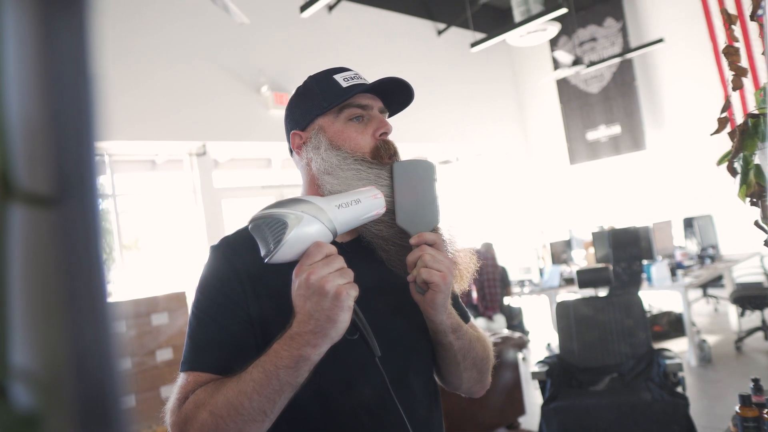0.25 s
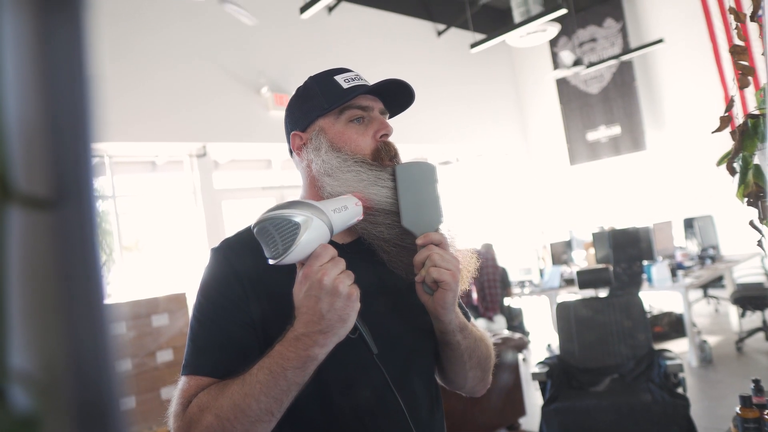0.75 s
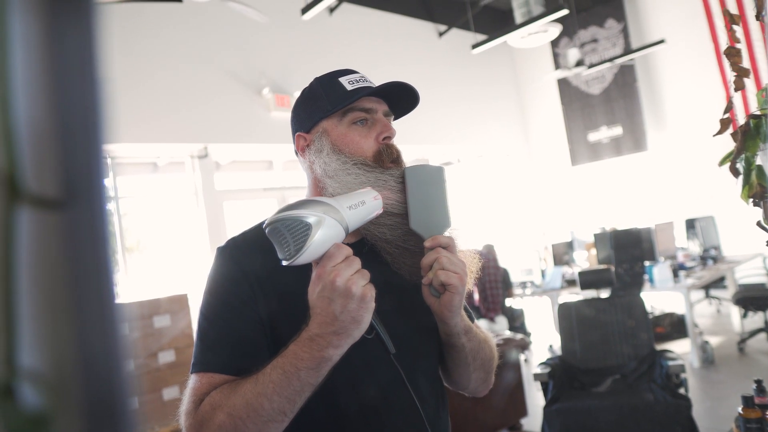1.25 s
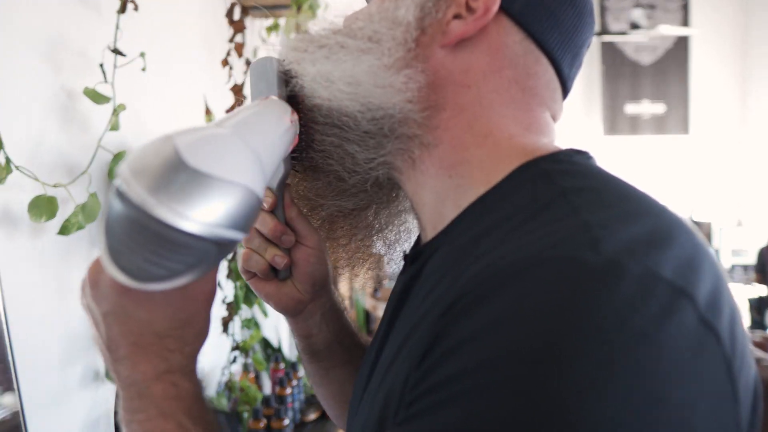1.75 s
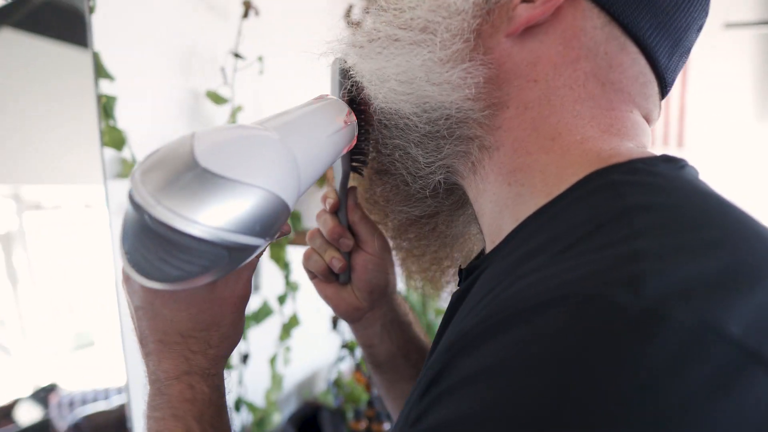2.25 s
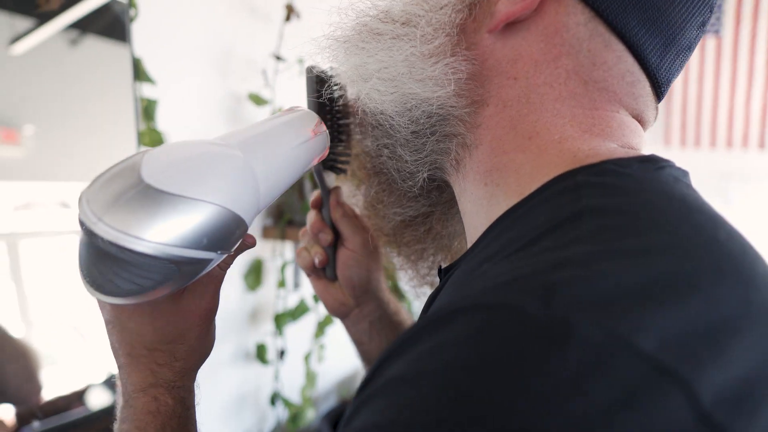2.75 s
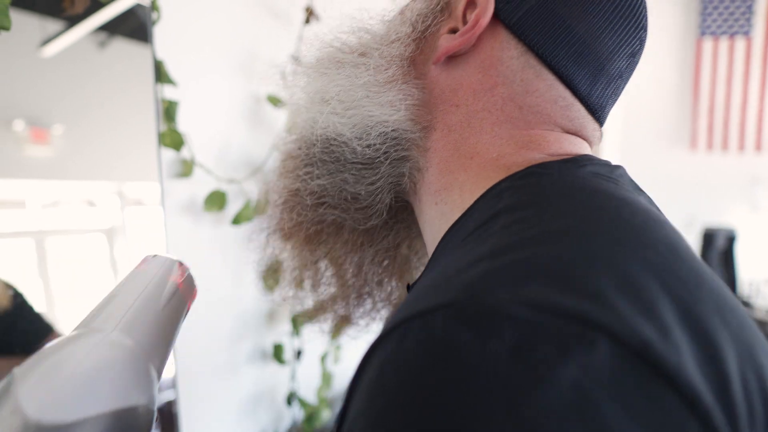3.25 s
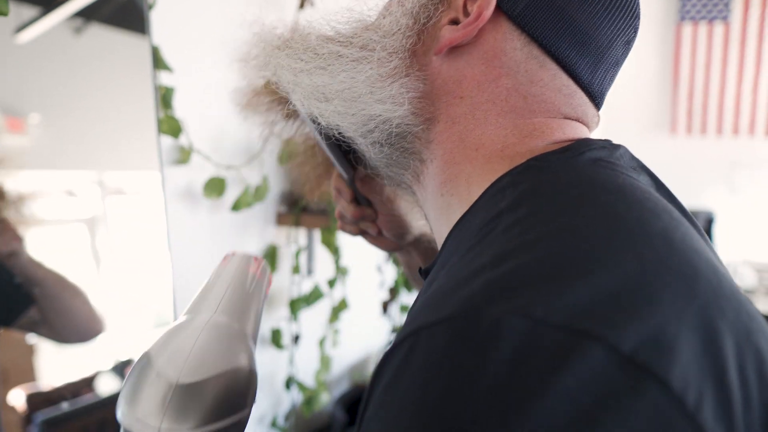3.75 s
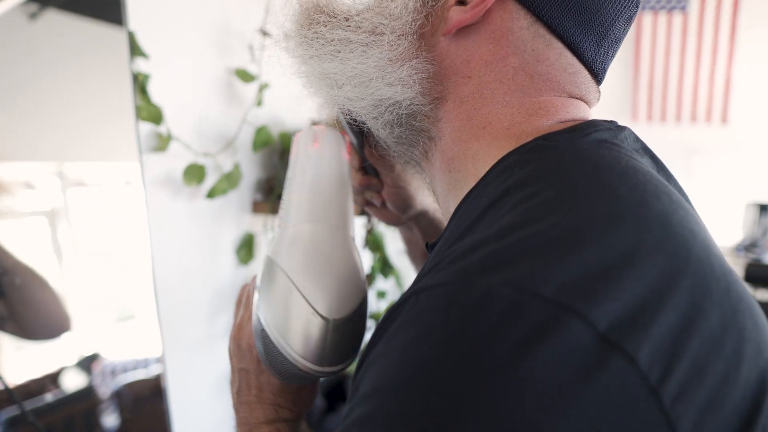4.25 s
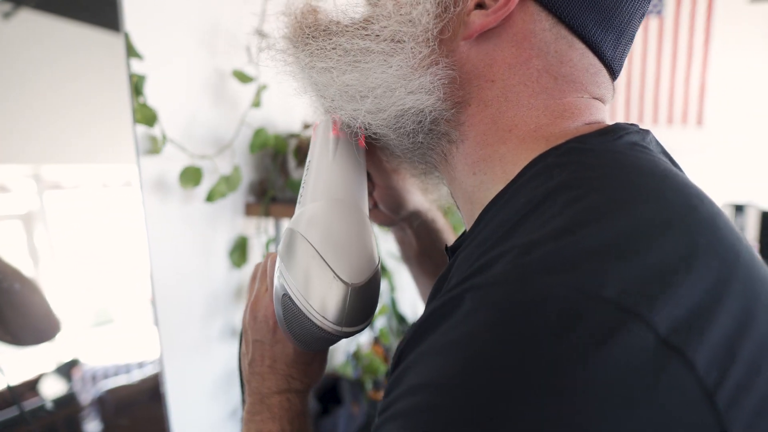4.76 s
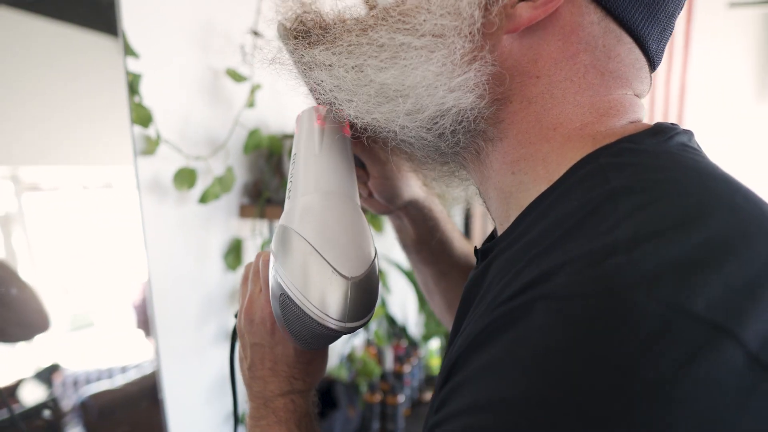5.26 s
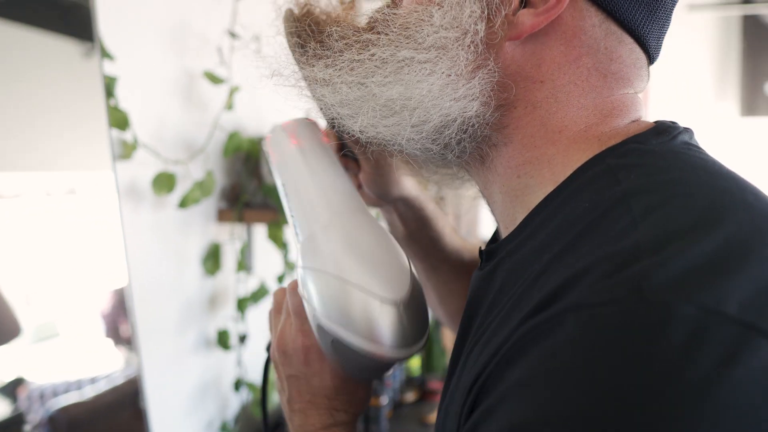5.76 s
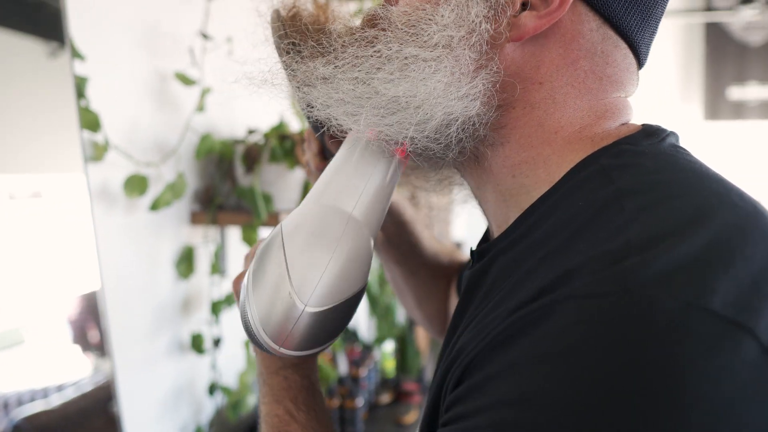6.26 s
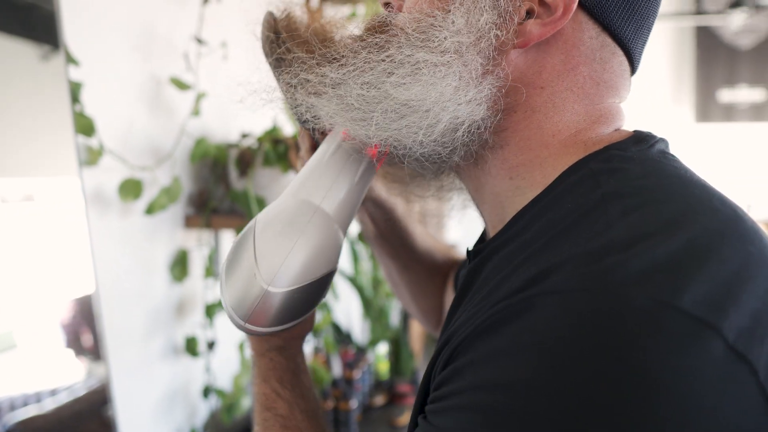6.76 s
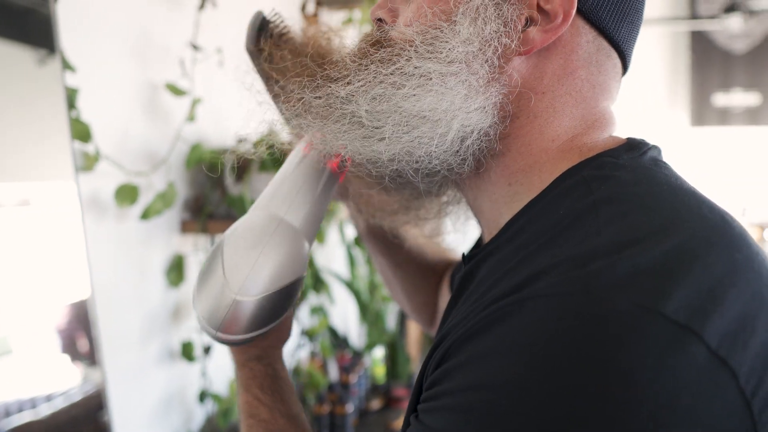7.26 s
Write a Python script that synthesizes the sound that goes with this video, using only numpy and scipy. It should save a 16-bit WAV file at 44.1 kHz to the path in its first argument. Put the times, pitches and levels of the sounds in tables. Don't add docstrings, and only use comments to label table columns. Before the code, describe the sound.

A hand-held hair dryer on low speed whines steadily near 785 hertz, its airy rush swelling and fading as it brushes through a beard.

```python
import sys
import numpy as np
from scipy import signal
from scipy.fft import rfft, irfft
from scipy.io import wavfile
from scipy.ndimage import uniform_filter1d

SR = 44100
rng = np.random.default_rng(int(sys.argv[2]) if len(sys.argv) > 2 else 0)


def volts_from_decibels(level):
    exponent = np.asarray(level, float) / 20
    return 10 ** exponent


def store_wav(level_fs):
    pcm = np.round(np.clip(np.atleast_2d(level_fs), -1, 1) * 32767)
    wavfile.write(sys.argv[1], SR, pcm.T.astype(np.int16))


N = 330750
T = np.arange(N) / SR
F = np.maximum(np.arange(N // 2 + 1) * SR / N, 1)

MAINS_HZ = 60
MAINS_PHASE = 2 * np.pi * MAINS_HZ * T
CHANGE_S, REPEAT = 1.447, 11036
NULL_S, RETURN_S = 6.43, 0.13
TOP_HZ = 15720
SPLIT_DB = -1.5

# time in seconds, blade rate in Hz.
SPEED = [(0, 788.3), (.6, 789.6), (1.2, 788.3), (1.8, 790), (2.7, 789.7), (3.55, 786), (3.95, 788.1),
         (4.8, 785), (5.7, 782.4), (6.38, 783), (6.52, 778.5), (6.7, 780.5), (7.2, 782.2), (7.5, 782.8)]
# time in seconds, level in dB.
BLADE = [(0, -32), (.45, -34.5), (.75, -38), (1.0, -36.5), (1.44, -36), (1.7, -32), (2.0, -30),
         (3.1, -32.5), (3.4, -36), (3.85, -35), (4.25, -28.5), (5.15, -26), (5.5, -29), (5.76, -26.5),
         (5.9, -29.5), (6.41, -30), (7.4, -31), (7.5, -33.5)]
# time in seconds, level in dB.
OCTAVE = [(0, -53), (.42, -53), (.69, -37), (1.0, -46), (1.44, -44.5), (1.7, -45), (2.0, -43.5), (3.3, -46),
          (3.62, -49), (4.0, -41), (4.2, -51), (4.42, -39), (4.8, -52), (5.4, -43), (5.7, -41.5),
          (6.36, -40.5), (6.65, -39), (7.5, -44)]
# multiple of the shaft rate, level in dB against the blade tone.
SHAFT_ORDERS = [(1, -27.5), (2, -22), (5, -24.5), (6, -16.5), (9, -27), (10, -25.5), (11, -26), (12, -24)]
# time in seconds, order 1 in dB, order 6 in dB.
FACING = [(0, 3, 0), (1.44, -12, 8), (1.46, -6, -8), (2.2, -1, -5), (3, -2, 2), (3.8, 1, -1),
          (4.4, 4.5, -1), (5.2, -0.5, 1), (5.7, 6, 5.5), (6, -2, -0.5), (6.5, 4, 0), (7, 5, -1),
          (7.2, -3, 5), (7.5, -7, 6)]
# time in seconds, order 2 in dB, order 5 in dB, order 10 in dB.
TURNED = [(0, 2, -9, 6), (.75, 12, -7, 8), (1.44, 4, -22, 4), (2.2, 0, -23, -19), (3.2, -2, -3, 12),
          (4.2, -6, 14, -6), (5.2, -5, 5, -4), (6.2, 4.5, 6, 6), (7.5, 1, 6, -3)]
# multiple of the shaft rate, level in dB.
WHISTLES = [(42, -70), (44, -67), (49, -80), (62, -76)]
BANDS_HZ = [0, 70, 330, 1000, 2800, 6500, 10500, 30000]
# frequency in Hz, density in dB per Hz.
FAR = [(15, -49), (25, -25), (55, -18), (514, -4), (604, -2), (710, -5.5), (770, -7), (835, -9.5),
       (1120, -4.5), (1930, -7), (2330, -9.5), (9480, -27), (15800, -37)]
# frequency in Hz, density in dB per Hz.
NEAR = [(15, -56), (25, -35.5), (248, -19), (730, -6), (791, -7), (858, -7.5), (1040, -15), (1680, -15.5),
        (1930, -16), (3050, -21), (4220, -23.5), (9740, -33), (15800, -42)]
# centre in Hz, width in Hz, lift in dB.
BARREL = [(641, 187, 9.5), (1870, 280, 0.5), (3650, 1200, 1.5), (6290, 490, 3.5), (9200, 1000, 1.5)]
# start and end in seconds, centre and width in Hz.
RINGS = [(-.2, 1.45, 1950, 180), (1.45, 3.9, 1950, 250), (3.9, 4.85, 1900, 200), (5.55, 7.7, 1930, 300),
         (4.15, 5.9, 1100, 400), (1.45, 2.1, 2800, 130), (.6, 4, 2550, 250), (4.3, 5.4, 2600, 150),
         (-.2, 2.1, 3600, 250), (3.75, 4.05, 3400, 300), (5.42, 5.6, 3700, 200), (-.2, .6, 4200, 200),
         (1.2, 2.1, 4200, 200), (2.8, 3.8, 4200, 180), (4.62, 5.42, 4100, 400), (5.6, 5.88, 4200, 300),
         (6.6, 7.7, 4000, 320), (4.1, 4.6, 5000, 600), (5.3, 5.95, 5000, 500), (-.2, 1.3, 6250, 800),
         (3.5, 3.9, 6480, 250), (1.4, 2.05, 8200, 350), (3.15, 3.6, 8250, 200), (4.5, 5.6, 8300, 300),
         (-.2, 3.2, 9600, 250), (3.7, 4, 9700, 200), (4.4, 4.9, 9650, 200), (6, 6.3, 9650, 200),
         (6.6, 7.7, 9500, 250), (6.3, 7.1, 12000, 600)]
RINGS_DB = [-5, -6.5, -9, -6.5, -1.5, -15.5, -14, -16.5, -9.5, -7, -4, -12, -12.5, -15, -5, -5.5, -8.5, -13,
            -10, -16.5, -15, -10, -16, -16, -13, -13, -15, -16, -15, -10]
# time in seconds, extra path in ms, share of the direct sound.
MIRROR = [(0, .4, .1), (1.44, .4, .1), (1.46, .45, .15), (3, .45, .1), (3.65, .66, .1), (3.85, .61, .3),
          (4.05, .47, .18), (4.3, .33, .12), (4.5, .6, .15), (4.65, .7, .25), (5, .7, .1), (7.5, .7, .1)]
# time in seconds, lean in dB.
LEAN = [(0, -1), (.5, -3), (1.44, -4.5), (1.7, 0), (2.1, 0.5), (2.6, -0.5), (3.0, 0), (3.6, -4), (3.9, -1),
        (4.37, 3.5), (5.3, 4), (5.47, 1.5), (5.77, 6), (5.97, 2.5), (6.36, 1.5), (6.5, 1), (7.1, -0.5),
        (7.5, -0.5)]
# time in seconds, force in dB.
STRIKE = [(0, -3), (.39, -5.5), (.78, 10.5), (1.2, 0.5), (1.44, 0.5), (1.7, 3), (2.0, -1), (3.1, -3),
          (3.45, -7), (4.35, 1.5), (4.65, 1.3), (5.3, -2), (5.57, -3), (5.9, -0.5), (6.45, 5.5), (6.9, 1.5),
          (7.2, 1.5), (7.5, -3)]
# time in seconds, openness in dB.
BRISTLES = [(0, 3), (.4, 6), (.8, -7.5), (1.4, 3), (1.7, -4.5), (2.2, -1), (2.55, 0), (3.0, -3), (3.3, 0.5),
            (3.7, 4.5), (4.0, 0), (4.35, -0.5), (4.7, -1), (5.1, 2), (6.2, -0.3), (6.45, 1.5), (7.2, -1),
            (7.5, 1)]
# time and length in seconds, hiss in dB, rumble in dB.
FLICKS = [(.15, .2, -2.2, 1), (.97, .15, 0.5, 2.5), (1.794, 0.085, -2, 7), (2.75, .4, 0.6, 4.5),
          (3.3, 0.27, 1.5, 3), (3.7, .025, -2.5, 10), (3.9, .12, -1.3, 3), (4.55, 0.15, -2, 1.5),
          (5.717, 0.11, 5, 7.5), (5.993, 0.069, 4, 5), (6.36, .06, .1, 4.5), (6.658, 0.091, -0.5, 3),
          (7.3, .1, -1, 2.5)]
LAYERS = {"hum": (-60, 11.5, 0.2, 0, -0.24, -0.3, 1.37), "vent": (-45, 3, -0.23, 0.62, 0.36, 0.55, 0.6),
          "barrel": (-28, 0.3, 1.11, 0.0456, 0.03, -0.13, -0.13),
          "grille": (-33.5, 4, 0.32, 0.43, 0.21, .5, 0.1541), "jet": (-39, 4.5, 0.25, 0.3, -0.1, .6, 0.07),
          "hiss": (-45.5, 0.3, 0.3, 1.04, 0.06, -0.1, 0.22),
          "bristle": (-50, -1.5, 0.23, 1.63, 1.3, 1.4, 0.33)}
# time in seconds, centre in Hz, level in dB.
PUFF = [
    (3.595, 30, -58),
    (3.622, 42, -35),
    (3.645, 75, -39),
    (3.675, 130, -39),
    (3.7, 170, -41),
    (3.725, 190, -68),
]
# time in seconds, lowest Hz, highest Hz.
SIDE_PATCHES = [(.125, 7500, 13200), (.33, 4160, 7000), (.425, 12400, 15700), (1.12, 5600, 9000),
                (2.1, 6800, 10400), (2.145, 4600, 5800), (2.19, 12400, 15700), (2.75, 8200, 10400),
                (2.84, 11000, 13800), (3.725, 4600, 6260), (3.725, 12400, 13800), (6.205, 13070, 14500),
                (6.325, 6900, 9000), (6.325, 12400, 13820), (6.58, 5600, 10400), (6.79, 4200, 5230),
                (6.905, 7500, 14500), (7.275, 4200, 6300)]


def dryer():
    blade_hz, = curves(SPEED)
    blade_db, = curves(BLADE)
    octave_db, = curves(OCTAVE)
    turn = 2 * np.pi * np.cumsum(blade_hz / 4 + .1 * walk(20)) / SR
    tones = fan(turn, blade_db, octave_db) + commutator(turn)
    return tones + airflow(turn, blade_db)


def fan(turn, blade_db, octave_db):
    into_null = np.tanh((NULL_S - T) / 0.013)
    out_of_null = -np.tanh(((T - NULL_S) / RETURN_S) ** 2)
    flip = np.where(T < NULL_S, into_null, out_of_null)
    out = flip * volts_from_decibels(blade_db + 1.0 * walk(14)) * np.sin(4 * turn + 0.54 * walk(25))
    out = out + volts_from_decibels(octave_db - 1.0 + 1.1 * walk(12)) * np.sin(8 * turn)
    ripple = 1 + 0.63 * np.cos(MAINS_PHASE)
    steady_db = uniform_filter1d(blade_db, SR)
    facing_db = dict(zip([1, 6, 2, 5, 10], curves(FACING) + curves(TURNED)))
    for order, db in SHAFT_ORDERS:
        fade_db = facing_db.get(order, 2.2 * walk(2))
        out = out + volts_from_decibels(steady_db + db + fade_db) * ripple * np.sin(order * turn + order)
    return np.sqrt(2) * out


def commutator(turn):
    chop = 1 + 2.7 * np.cos(MAINS_PHASE)
    out = 0
    for order, db in WHISTLES:
        whistle = np.sin(order * turn + .6 * walk(30))
        out = out + volts_from_decibels(db + 2.2 * walk(3.4)) * chop * whistle
    return out


def airflow(turn, blade_db):
    barrel_db, grille_db, jet_db, hiss_db, bristle_db = levels("barrel", "grille", "jet", "hiss", "bristle")
    air_power = volts_from_decibels(barrel_db) ** 2 - 1.28 * volts_from_decibels(blade_db) ** 2
    barrel = np.sqrt(np.maximum(air_power, volts_from_decibels(barrel_db - 8.5) ** 2))
    body = barrel * air(2) + volts_from_decibels(grille_db - 1.75) * air(3)
    body = body + rings([grille_db, jet_db, hiss_db, bristle_db])
    gust = walk(9.7)
    treble = volts_from_decibels(jet_db - 0.72 + 0.34 * gust) * air(4)
    treble = treble + volts_from_decibels(hiss_db - 0.5 + 0.41 * gust) * air(5)
    treble = treble + volts_from_decibels(bristle_db + 0.33 * gust + 0.24 * walk(25)) * air(6)
    throb = 1 + .025 * np.cos(MAINS_PHASE) + .03 * np.cos(turn)
    return body + throb * mirrored(treble)


def air(band):
    return np.where(T < CHANGE_S, rush(FAR, band), rush(NEAR, band))


def rush(colour, band):
    colour_hz, colour_db = np.transpose(colour)
    db = np.interp(np.log(F), np.log(colour_hz), colour_db)
    for hz, width, lift_db in BARREL:
        db = db + lift_db / (1 + (2 * (F - hz) / width) ** 2)
    share = np.clip(below(BANDS_HZ[band + 1]) - below(BANDS_HZ[band]), 0, 1)
    share = share * below(15800, steep=20)
    random_phase = np.exp(2j * np.pi * rng.random(len(F)))
    return unit(irfft(random_phase * volts_from_decibels(db) * np.sqrt(share), N))


def rings(levels_db):
    noise, out = rfft(rng.standard_normal(N)), 0
    for (start, end, hz, width), db in zip(RINGS, RINGS_DB):
        ring = unit(irfft(noise / (1 + (2 * (F - hz) / width) ** 2), N))
        gate = np.clip(np.minimum(T - start, end - T) / .12 + .5, 0, 1)
        around_db = levels_db[np.searchsorted(BANDS_HZ, hz) - 4]
        out = out + gate * volts_from_decibels(around_db + db) * ring
    return out


def mirrored(x):
    path_ms, share = curves(MIRROR)
    echo = np.interp(T - path_ms / 1000, T, x)
    return (x + share * echo) / np.sqrt(1 + share ** 2)


def puff():
    hz, db = curves(PUFF)
    swing = 2 * np.pi * np.cumsum(hz * (1 + 0.203 * walk(60))) / SR
    wave = np.sin(swing) + .8 * np.sin(swing / 2 + 1)
    wave = wave + .6 * walk(85) * np.sin(2.3 * swing)
    return volts_from_decibels(db + 2.0 * walk(50)) * (T > 3.5) * (T < 3.8) * wave


def office():
    hum_db, vent_db = levels("hum", "vent") + [1.3 * walk(9), .4 * walk(3.2)]
    hum = volts_from_decibels(hum_db + 2.0) * (np.sin(MAINS_PHASE) + 0.42 * np.sin(2 * MAINS_PHASE))
    return hum + volts_from_decibels(hum_db - 4) * air(0) + volts_from_decibels(vent_db - .8) * air(1)


def levels(*layers):
    flicks = sum(np.outer(dbs, np.exp(-((T - s) / length) ** 2)) for s, length, *dbs in FLICKS)
    hands = curves(LEAN) + curves(STRIKE) + curves(BRISTLES) + list(flicks)
    controls = [np.ones(N), T < CHANGE_S] + hands
    return np.array([LAYERS[layer] for layer in layers]) @ np.array(controls)


def curves(table):
    s, *columns = np.transpose(table)
    return [np.interp(T, s, c) for c in columns]


def walk(rate):
    k = int(SR / rate)
    held = np.repeat(rng.standard_normal(N // 500)[:N // k + 1], k)[:N]
    return unit(uniform_filter1d(uniform_filter1d(held, k), k))


def unit(x):
    return x / np.sqrt(np.mean(x ** 2))


def below(hz, steep=6):
    return 1 / (1 + (F / max(hz, .01)) ** steep)


def scene():
    mono = dryer() + puff() + office()
    ahead = np.roll(mono, -REPEAT)
    swap = np.clip(np.minimum(T - CHANGE_S, CHANGE_S + REPEAT / SR - T) / .002 + .5, 0, 1)
    mono = np.sqrt(1 - swap) * mono + np.sqrt(swap) * ahead
    mono = irfft(rfft(mono) * (F < TOP_HZ), N)
    return np.array([mono, mono])


def band_limit(x):
    return signal.sosfilt(signal.butter(12, 15980, fs=SR, output="sos"), x)


def record(dry):
    size = 2048
    hz, side = np.arange(size // 2 + 1) * SR / size, np.zeros(N)
    window = np.sin(np.pi * np.arange(size) / size)
    for s, low_hz, high_hz in SIDE_PATCHES:
        start = int(s * SR) - size // 2
        colour = np.abs(rfft(window * dry[0, start:start + size])) * (hz > low_hz) * (hz < high_hz)
        random_phase = np.exp(2j * np.pi * rng.random(len(hz)))
        side[start:start + size] += volts_from_decibels(SPLIT_DB) * window * irfft(colour * random_phase)
    return band_limit(dry + np.array([side, -side]))


dry = scene()
out = record(dry)
store_wav(out)
```